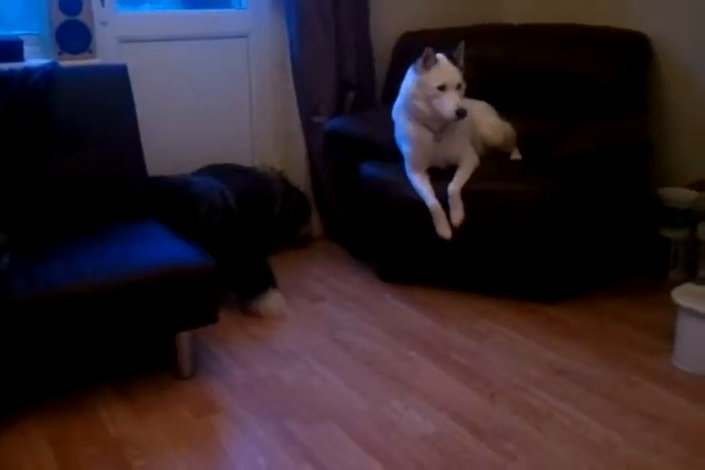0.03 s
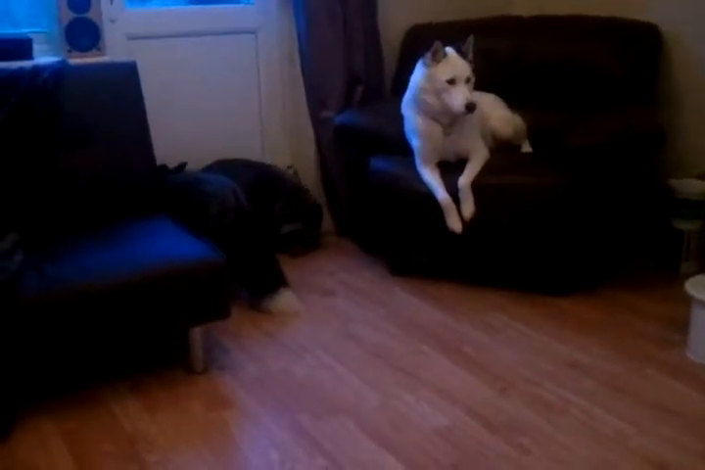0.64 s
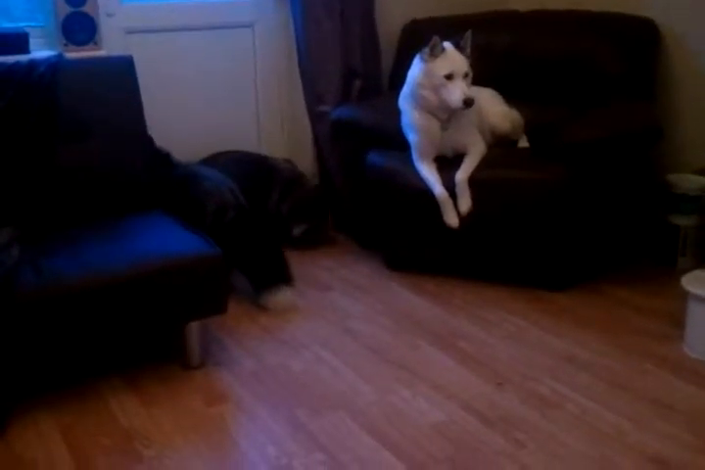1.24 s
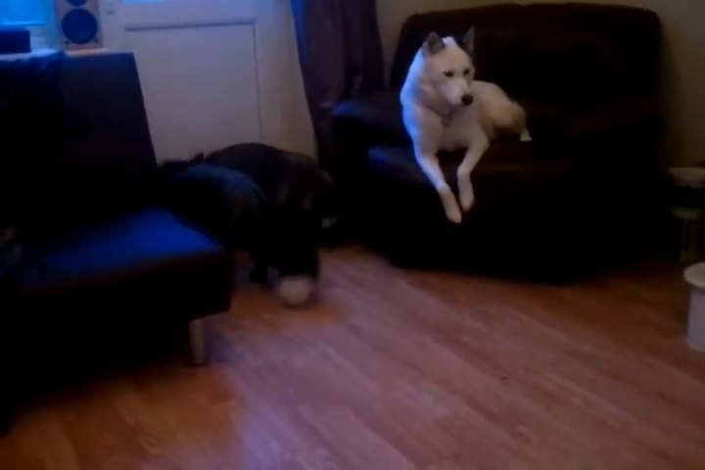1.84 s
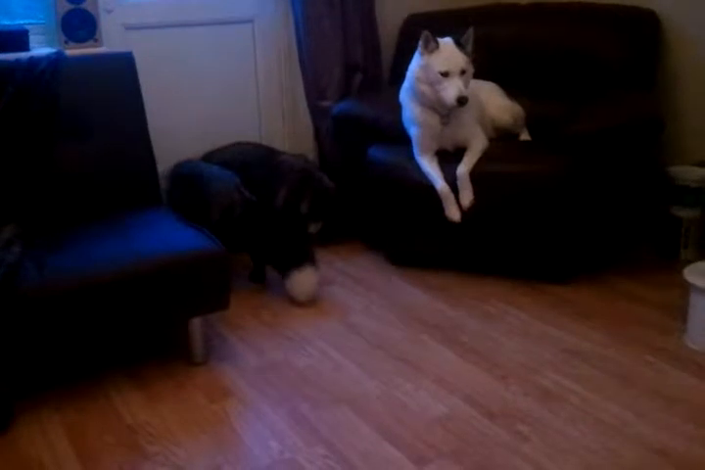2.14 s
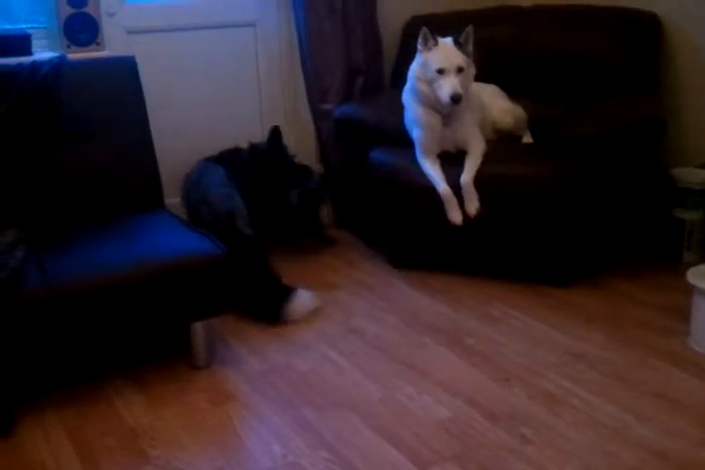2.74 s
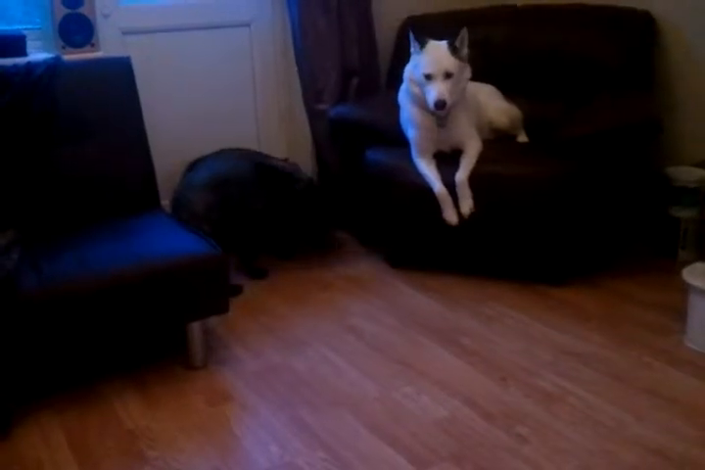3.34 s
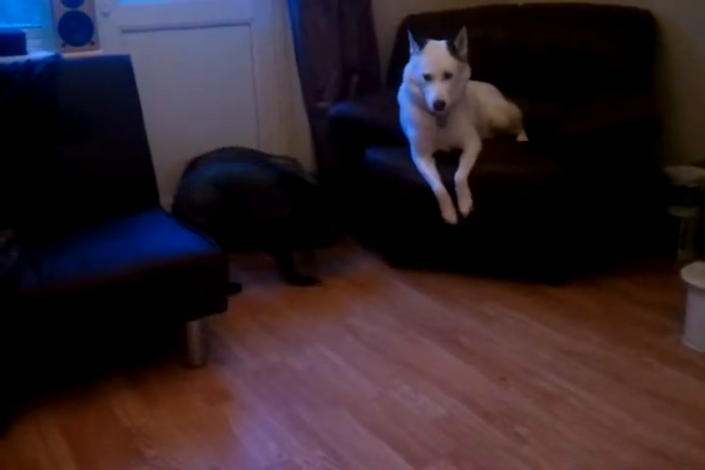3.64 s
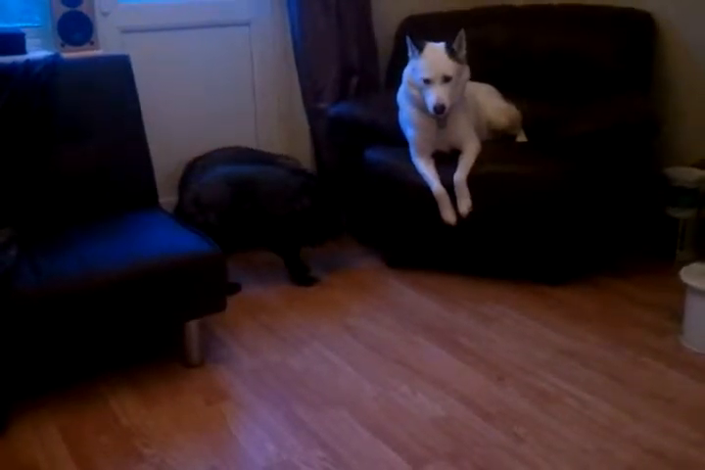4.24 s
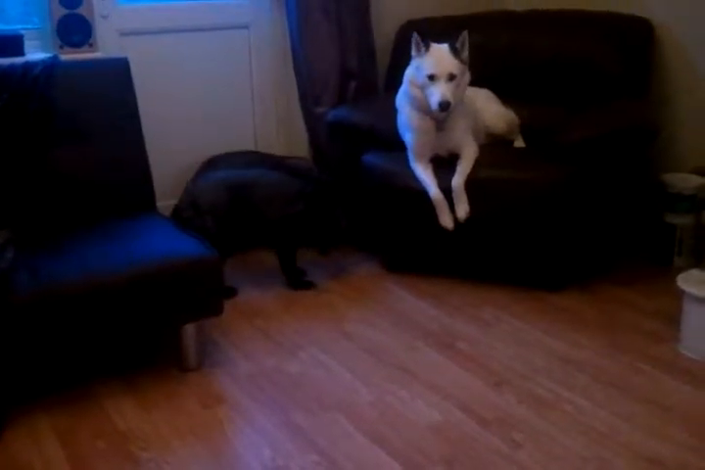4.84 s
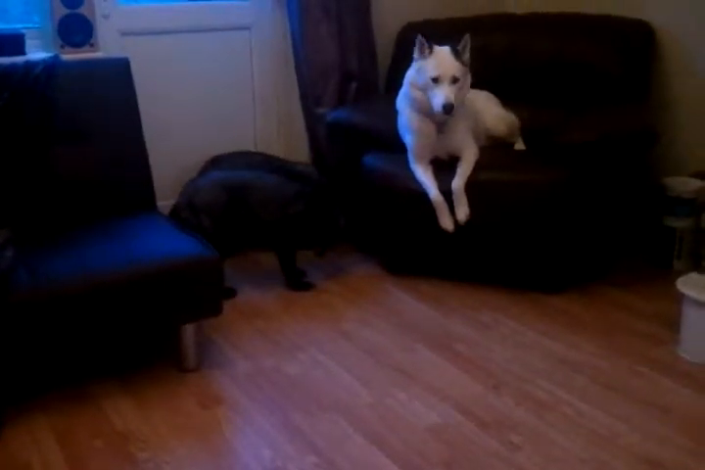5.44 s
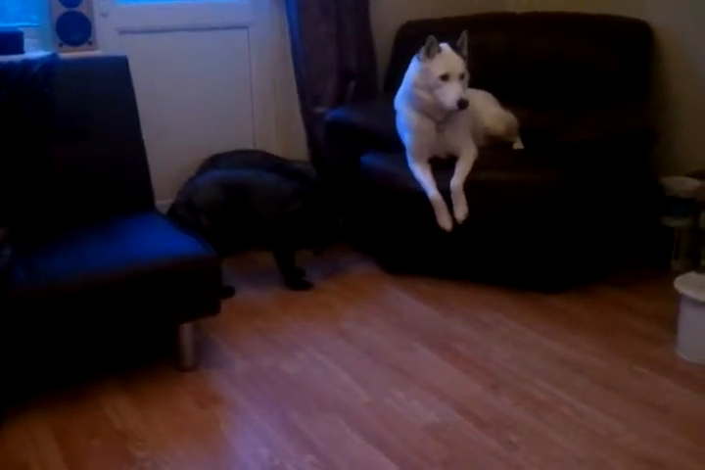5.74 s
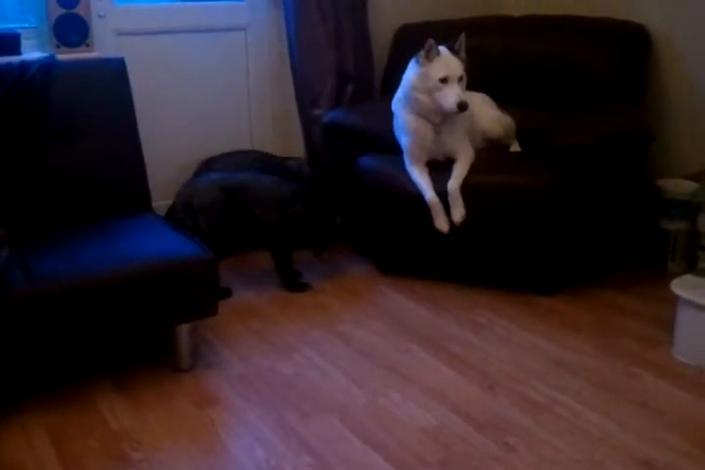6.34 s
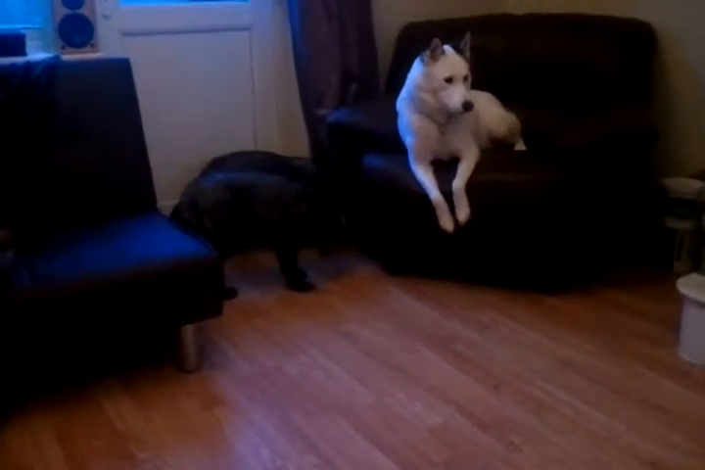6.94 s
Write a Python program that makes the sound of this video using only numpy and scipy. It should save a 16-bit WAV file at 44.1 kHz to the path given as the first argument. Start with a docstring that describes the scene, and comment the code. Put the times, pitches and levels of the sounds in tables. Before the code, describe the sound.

A dog noses about on a wooden floor a few metres from the microphone in a small living room. Its metal collar tag chinks faintly, then a hard toy knocks sharply on the boards. Claws click and soft pads thump. Twice the paws scrape while the tag jingles. A lighter toy knock and a soft step end it. Every contact has a short echo, over faint steady hiss.

```python
"""A dog noses about on a wooden floor, a few metres away in a small living room, over hiss and hum.
First its metal collar tag chinks faintly; just after 1 s a hard toy knocks sharply on the boards.
Claws then click and soft pads thump. Near 3 s, and again near 4.7 s, the paws scrape and rub
while the tag chatters on its ring. The toy knocks with a claw click at 6 s, and a soft step ends it.
Throughout, bare walls answer every contact with echoes and a short reverberation."""
import sys
import numpy as np
from scipy import signal
from scipy.fft import rfft, irfft, next_fast_len
from scipy.io import wavfile
from scipy.ndimage import uniform_filter1d, map_coordinates

SR = 44100
rng = np.random.default_rng(int(sys.argv[2]) if len(sys.argv) > 2 else 0)


def dump_mix(stems):
    """Bounce the given channels to the path in sys.argv[1] as a 16-bit WAV at rate SR."""
    frames = np.atleast_2d(stems).T  # one column per channel
    limited = np.clip(frames, -1, 1)  # hard clip at full scale
    pcm = np.round(limited * 32767).astype(np.int16)
    wavfile.write(sys.argv[1], SR, pcm)


N = 313021
SIZE = 32768  # samples in one contact with its reverberation
T = np.arange(SIZE) / SR
HZ = np.fft.rfftfreq(SIZE, 1 / SR)


def amp(db):
    """Amplitude ratio of a level in decibels."""
    return 10 ** (np.asarray(db) / 20)


def along(points, hz):
    """Interpolation of (f/Hz, value) points on a logarithmic frequency axis."""
    f, values = np.transpose(points)
    return np.interp(np.log(hz + 1), np.log(f), values)


def resonance(hz, width_hz):
    """Magnitude response of a damped oscillator, 1 at resonance."""
    return HZ * width_hz / np.hypot(hz ** 2 - HZ ** 2, HZ * width_hz)


def impulse(gain):
    """Minimum-phase impulse response of a magnitude spectrum, by folding the cepstrum."""
    cepstrum = irfft(np.log(np.maximum(gain, 1e-4)))
    cepstrum[1:SIZE // 2] *= 2
    cepstrum[SIZE // 2 + 1:] = 0
    return irfft(np.exp(rfft(cepstrum)))


def filtered(x, gain):
    """Zero-phase filtering by a gain that is a function of frequency."""
    size = next_fast_len(N + SIZE)
    return irfft(rfft(x, size) * gain(np.fft.rfftfreq(size, 1 / SR)), size)[:N]


def add(track, s, db, sound, span_s=0.0037):
    """Superposition: a sound enters at time s, with rms level db over its loudest span."""
    power = uniform_filter1d(sound ** 2, max(int(span_s * SR), 1)).max()
    part = track[max(round(s * SR), 0):][:SIZE]
    part += amp(db) * sound[:len(part)] / np.sqrt(power)


# spectrum of the room's hiss: f/Hz, relative level/dB
HISS_SPECTRUM = [(15, -48.5), (25, -33.5), (43, -16), (118, -7), (143, -3.5), (323, -2.5), (356, -3),
                 (596, -2), (642, -3.5), (929, -5.5), (1190, -7), (2250, -10), (5870, -12.5), (6980, -18.5),
                 (8920, -52.5), (11600, -67), (19600, -120)]
# tones of an appliance: f/Hz, rms level/dB
HUM_TONES = [(49, -88), (145, -83)]


def background():
    """Stationary noise makes the hiss; slow phase modulation makes the hum slightly unsteady."""
    hiss = filtered(rng.standard_normal(N), lambda hz: amp(along(HISS_SPECTRUM, hz)))
    out = amp(-59) * hiss / hiss.std()
    t = np.arange(N) / SR
    for hz, db in HUM_TONES:
        drift = map_coordinates(rng.standard_normal(40), [t * 3])  # three new values a second
        out += amp(db) * np.sqrt(2) * np.sin(2 * np.pi * hz * t + .6 * drift)
    return out


# reverberation time of the room: f/Hz, T60/s
REVERB_TIMES = [(150, 0.17), (600, 0.34), (2000, 0.55), (5000, 0.5), (9000, 0.38)]
# early reflections from the walls: delay/s, level/dB re the direct sound
REFLECTIONS = [(.0025, -9.5), (.0052, -21.5), (0.0098, -13), (0.0126, -11.5), (.022, -8)]


def in_room(sound, wet_db, scatter_db=-2, scatter_t60=0.22):
    """Convolution with direct path, echoes, scatter off furniture and tail, new for each spot."""
    hz, t, spectra = signal.stft(rng.standard_normal(SIZE), SR, nperseg=256)
    decay = amp(-60 * t / along(REVERB_TIMES, hz)[:, None])
    tail = signal.istft(spectra * decay, SR, nperseg=256)[1][:SIZE]
    tail /= np.linalg.norm(tail)
    scatter = rng.standard_normal(SIZE) * amp(-60 * T / scatter_t60)
    scatter /= np.linalg.norm(scatter)
    response = amp(wet_db) * (tail + amp(scatter_db) * scatter)
    response[0] += 1  # direct path
    for delay, db in REFLECTIONS:
        arrival = abs(delay * (1 + .06 * rng.standard_normal()))
        response[int(arrival * SR)] += amp(db)
    return signal.fftconvolve(sound, response)[:SIZE]


# response of the boards to a soft pad: f/Hz, relative level/dB
PAD_SPECTRUM = [(50, -23), (120, -9), (200, 3.5), (300, -4.5), (450, 0), (680, 1), (900, -13.5), (1500, -4),
                (3000, -22), (9000, -33.5)]
# soft steps: t/s, level/dB, board resonance f/Hz
SOFT_STEPS = [(0.706, -48.5, 508), (1.642, -42, 487), (1.967, -38.5, 435), (1.978, -52, 600),
              (2.411, -48, 560), (2.995, -49.5, 606), (3.354, -50, 605), (4.579, -49.5, 640),
              (4.984, -48, 590), (5.821, -54, 690), (6.942, -46, 660), (6.97, -58, 600)]


def pads(claw_clicks, toe_lag_s=0.02, pad_lag_s=.008, board_hz=620):
    """Soft impact excites mainly low resonances of the boards; toes follow a pad, a pad each claw."""
    out = np.zeros(N)
    toes = [(s + toe_lag_s, db - 6, hz) for s, db, hz in SOFT_STEPS]
    after_claws = [(s + pad_lag_s, -39.5 + 0.48 * db, board_hz) for s, db, *_ in claw_clicks]
    for s, db, hz in list(SOFT_STEPS) + toes + after_claws:
        thump = impulse(resonance(hz, width_hz=310) * amp(along(PAD_SPECTRUM, HZ)))
        add(out, s, db, in_room(thump, wet_db=5))
    return out


def stroke(length, gain, slips_per_s, uneven_db, wet_db):
    """Stick-slip friction: random slips, each a tiny tick, under a pressure that peaks mid-stroke."""
    slips = (rng.random(SIZE) < slips_per_s / SR) * rng.choice([-1, 1], SIZE)
    strength = amp(uneven_db * rng.standard_normal(SIZE))
    pressure = np.sin(np.pi * np.clip(T / length, 0, 1)) ** 0.64
    ticks = signal.fftconvolve(slips * strength * pressure, impulse(gain))[:SIZE]
    return in_room(ticks, wet_db)


# spectra of a sliding claw and a sliding pad: f/Hz, relative level/dB
SCRAPE_SPECTRUM = [(300, -32), (1500, -34), (3200, -13), (4400, 0.5), (5400, 0), (6500, -0.5), (7300, -9),
                   (9000, -16)]
RUB_SPECTRUM = [(100, -19.5), (300, -27), (620, -1), (1000, -5), (1600, -3.5), (2400, 2), (2900, 2.5),
                (3500, -10), (6000, -16.5), (9000, -23.5)]
# slides of a paw: t/s, duration/s, scrape level/dB, rub level/dB
PAW_SLIDES = [(0.55, 0.079, -58, -56.5), (1.336, 0.036, -36.5, -44.5), (1.952, .04, -44.5, -57),
              (2.0, 0.028, -49, -57), (2.713, 0.073, -47, -42), (2.828, 0.05, -36.5, -55.5),
              (2.982, 0.065, -45, -45), (3.129, 0.1, -35, -46.5), (3.337, .062, -66, -53.5),
              (4.572, 0.067, -44, -61), (4.614, 0.072, -36.5, -53.5), (4.732, 0.033, -46.5, -68),
              (4.957, 0.052, -57, -46), (5.033, 0.028, -44, -55.5), (5.242, 0.036, -46.5, -53),
              (5.598, 0.032, -56, -70), (6.138, 0.05, -48.5, -63), (6.217, .022, -68, -57.5)]


def scuffs():
    """Sliding friction on wood: hard claws scrape brightly while the soft pad rubs lower down."""
    out = np.zeros(N)
    claw_gain, pad_gain = amp(along(SCRAPE_SPECTRUM, HZ)), amp(along(RUB_SPECTRUM, HZ))
    for s, length, scrape_db, rub_db in PAW_SLIDES:
        scrape = stroke(length, claw_gain, slips_per_s=1500, uneven_db=7.5, wet_db=3.5)
        rub = stroke(length, pad_gain, slips_per_s=1300, uneven_db=4.5, wet_db=2.5)
        add(out, s, scrape_db, scrape, span_s=0.014)
        add(out, s, rub_db, rub, span_s=0.022)
    return out


# free swings of the tag after a move of the head: start t/s, end t/s, first touch level/dB
TAG_SWINGS = [(2.521, 2.68, -52.5), (3.38, 3.54, -47.5), (4.019, 4.28, -45), (4.569, 4.62, -51)]


def swing_touches(interval_s=.105, loss_db=1.5, jitter_s=.002, uneven_db=0.8):
    """A damped pendulum: the tag touches once a swing, fading unevenly. Returns t/s, level/dB."""
    rows = [(s, db - loss_db * k)
            for start, end, db in TAG_SWINGS
            for k, s in enumerate(np.arange(start, end, interval_s))]
    return rows + rng.standard_normal((len(rows), 2)) * [jitter_s, uneven_db]


# modes of the metal tag: f/Hz, relative level/dB, T60/s
TAG_MODES = [(4180, -11, .05), (4233, 12.5, 0.061), (4640, -12.5, 0.041), (4470, -10.5, 0.055),
             (4860, -16, 0.024), (5380, -5, 0.07), (5570, -13, .05)]
# spectrum of its edge striking the ring: f/Hz, relative level/dB
CLASH_SPECTRUM = [(2500, -47), (3700, -31), (4150, 2.5), (5000, -1), (5700, -6.5), (6800, -15),
                  (9000, -31.5)]
# single chinks: t/s, level/dB, clash level/dB re the modes
TAG_CHINKS = [(0.209, -50.5, 1), (0.228, -51, 9), (0.3335, -47.5, 9), (2.7556, -41.5, -2),
              (3.0418, -33.5, -6), (3.076, -27, 1.5), (3.0894, -32, 1), (3.722, -46.5, -1),
              (3.7797, -33.5, 10), (3.899, -41, -5), (4.1171, -41, 8), (4.6477, -36, 0), (4.775, -38, -12),
              (5.4937, -50.5, -8)]


def tag_chinks(touches, touch_clash_db=6, detune=.005, spread_db=3.5, attack_s=.0012):
    """Free vibration: after a clash the tag's modes decay, each shifted a little by the ring's grip."""
    out = np.zeros(N)
    clash = impulse(amp(along(CLASH_SPECTRUM, HZ)))
    hz, mode_db, t60 = np.transpose(TAG_MODES)[:, :, None]
    for s, db, clash_db in list(TAG_CHINKS) + [(s, db, touch_clash_db) for s, db in touches]:
        shift, strength = rng.standard_normal((2, len(TAG_MODES), 1))
        envelopes = amp(mode_db + spread_db * strength - 60 * T / t60)
        modes = envelopes * np.sin(2 * np.pi * hz * (1 + detune * shift) * T)
        ringing = modes.sum(axis=0) * (1 - np.exp(-T / attack_s))
        chink = ringing / np.linalg.norm(ringing) + amp(clash_db) * clash / np.linalg.norm(clash)
        add(out, s, db, in_room(chink, wet_db=6.5, scatter_db=-4))
    return out


# slides of the tag along its ring: t/s, duration/s, level/dB
TAG_SLIDES = [(0.524, 0.038, -54), (2.97, .06, -32.5), (3.09, .066, -36), (4.641, .19, -38.5)]


def tag_chatter(touches, mode_hz=4225, spread_hz=50, burst_s=.034, contact_share=0.58, trail_s=.035):
    """Forced vibration: bursts of rapid taps on the ring keep the tag's main mode sounding."""
    out = np.zeros(N)
    clash = amp(along(CLASH_SPECTRUM, HZ) - 29.5)
    trails = [(s, trail_s, db - 9) for s, db in touches]  # each touch chatters briefly
    for start, length, db in list(TAG_SLIDES) + trails:
        bursts = max(round(length / burst_s), 1)
        spacing = length / bursts
        for k in range(bursts):
            hz = mode_hz + spread_hz * rng.standard_normal()  # the ring's grip shifts the pitch
            gain = resonance(hz, width_hz=28) * resonance(hz, width_hz=460) + clash
            burst = stroke(contact_share * spacing, gain, slips_per_s=800, uneven_db=8.5, wet_db=-9)
            add(out, start + k * spacing, db, burst, span_s=0.01)
    return out


# modes of the hard, hollow toy: f/Hz, bandwidth/Hz, relative level/dB
TOY_MODES = [(610, 170, -6), (1270, 130, -10.5), (1503, 190, 0.5), (2050, 270, -18), (2470, 320, -2.5),
             (3960, 130, 0.5), (4670, 660, -3), (6070, 760, -16), (7300, 330, -7)]
# response of the floor under it: f/Hz, relative level/dB
THUD_SPECTRUM = [(100, -35.5), (400, -27.5), (650, -3.5), (1000, 0.5), (1700, -3.5), (3000, -28.5),
                 (9000, -30.5)]
# knocks: t/s, level/dB, f/Hz favoured by the point of contact
TOY_KNOCKS = [(0.116, -49.5, 1480), (0.272, -51.5, 1290), (1.173, -24, 1630), (2.242, -43, 2100),
              (2.409, -43, 2350), (3.713, -48, 1530), (4.335, -49, 1600), (4.885, -49, 1780),
              (5.686, -47.5, 2050), (6.0923, -34, 1160)]


def toy(favour_db=7, favour_octaves=0.39, rock_s=.0105, rock_db=-6.5):
    """Modal excitation: the point of contact weights the toy's modes, and the floor adds a thud."""
    out = np.zeros(N)
    body = np.sqrt(sum((amp(db) * resonance(hz, width)) ** 2 for hz, width, db in TOY_MODES))
    for s, db, hz in TOY_KNOCKS:
        emphasis_db = favour_db * np.exp(-(np.log2((HZ + 1) / hz) / favour_octaves) ** 2)
        hardness_db = 0.23 * (db + 17.5)  # softer blows lose treble
        treble_db = along([(2700, 0.017), (3900, hardness_db)], HZ)
        thud_db = along(THUD_SPECTRUM, HZ) + 27 * np.log2(1360 / hz)  # lower knocks thud more
        knock = impulse(np.hypot(body * amp(emphasis_db + treble_db), amp(thud_db)))
        for lag, contact_db in [(0, 0), (rock_s, rock_db)]:  # it lands, then rocks onto its other edge
            add(out, s + lag, db + contact_db, in_room(knock, wet_db=4, scatter_db=-1, scatter_t60=0.16))
    return out


# response of a board to a claw: f/Hz, relative level/dB
BOARD_SPECTRUM = [(100, -19), (300, -11.5), (550, -2.5), (950, -5), (1250, -8.5), (1530, -1), (1900, -3),
                  (3000, -1), (4500, 4), (7000, -3), (9000, -17.5)]
# claw clicks: t/s, level/dB, tick f/Hz, board knock gain/dB
CLAW_CLICKS = [(0.561, -43.5, 5600, -10), (1.3369, -33.5, 4340, -2), (1.446, -40.5, 6560, -3),
               (1.5374, -22, 6230, -9), (1.649, -28.5, 5970, -14), (1.8473, -38, 5600, -28),
               (1.8605, -37, 6020, -12.5), (1.9977, -30.5, 4960, -9.5), (2.3173, -35, 5380, -32),
               (2.909, -17.5, 5700, -20), (2.933, -31, 6000, -22), (3.572, -30.5, 6400, -12),
               (3.5879, -26, 5830, -17.5), (3.8057, -17.5, 5550, -13), (4.724, -22.5, 5840, -13),
               (5.246, -40.5, 4400, 2), (5.261, -44, 5660, 3), (6.0915, -33.5, 5800, -22)]


def claws(skid_t60=0.0014, board_lag_s=.0007):
    """Brief contact gives a wide spectrum: a claw tip skids in a bright tick over a duller knock."""
    out = np.zeros(N)
    board = impulse(amp(along(BOARD_SPECTRUM, HZ)))
    knock = np.pad(board, (round(board_lag_s * SR), 0))[:SIZE]  # the board yields after the tip lands
    for s, db, hz, board_db in CLAW_CLICKS:
        skid = rng.standard_normal(SIZE) * amp(-60 * T / skid_t60)
        skid *= .5 / np.linalg.norm(skid)
        skid[0] = 1  # the first impact
        tick = signal.fftconvolve(skid, impulse(resonance(hz, width_hz=2100) ** 2))[:SIZE]
        click = in_room(tick + amp(board_db) * knock, wet_db=3, scatter_db=-3, scatter_t60=0.21)
        add(out, s, db, click, span_s=0.0012)
    return out


# treble roll-off of a small microphone: f/Hz, gain/dB
MICROPHONE_RESPONSE = [(6500, -3), (7200, -8.5), (7900, -21.5), (8600, -24.5), (9100, -32)]


def scene():
    """Superposition: the dog's sounds, dulled at the very top by the microphone, over the background."""
    room = background()
    touches = swing_touches()
    dog = claws() + toy() + pads(CLAW_CLICKS) + scuffs() + tag_chinks(touches) + tag_chatter(touches)
    dulled = filtered(dog, lambda hz: amp(along(MICROPHONE_RESPONSE, hz)))
    return (dulled + room)[None]


def record(dry):
    """Band limiting: an ideal low-pass filter cuts off at 9100 Hz."""
    return filtered(dry[0], lambda hz: hz < 9100)[None]


dry = scene()
out = record(dry)
dump_mix(out)
```